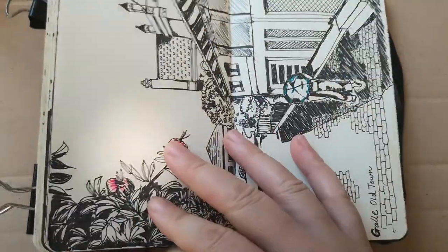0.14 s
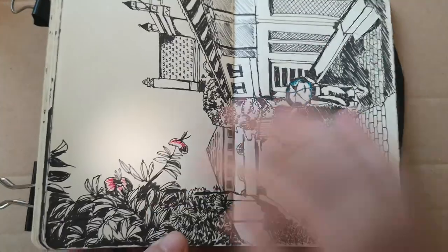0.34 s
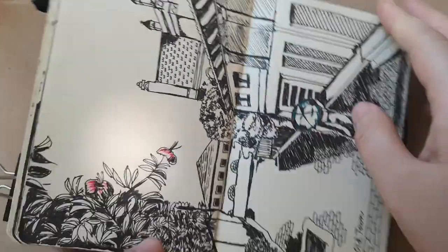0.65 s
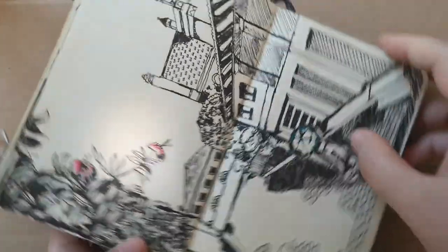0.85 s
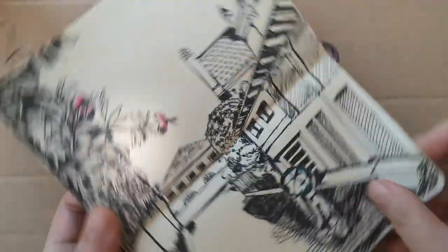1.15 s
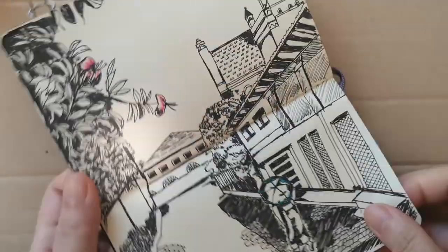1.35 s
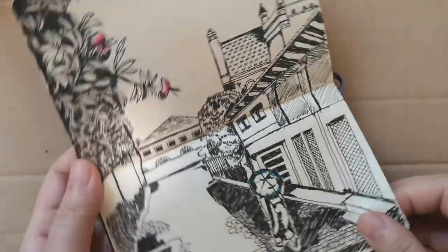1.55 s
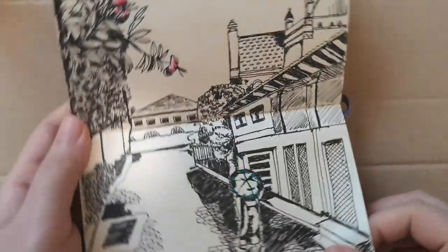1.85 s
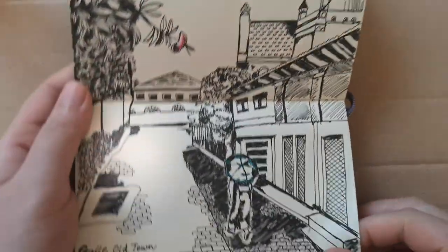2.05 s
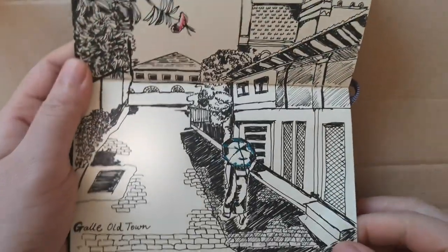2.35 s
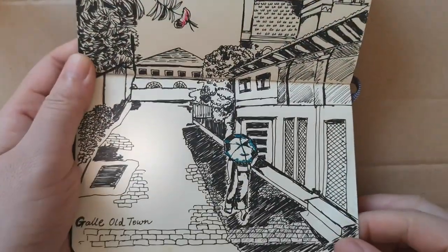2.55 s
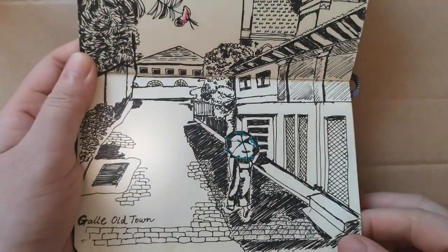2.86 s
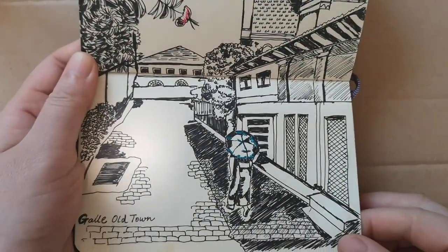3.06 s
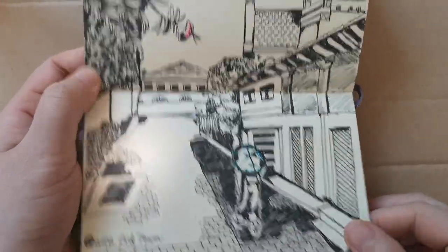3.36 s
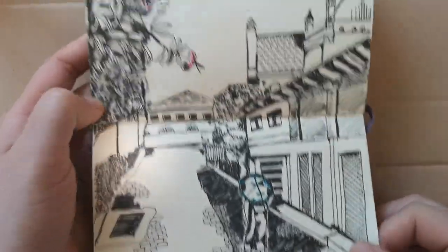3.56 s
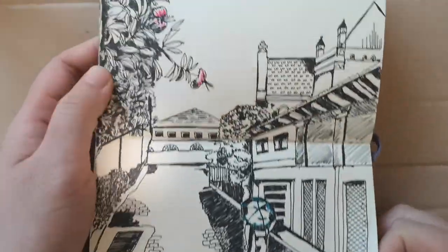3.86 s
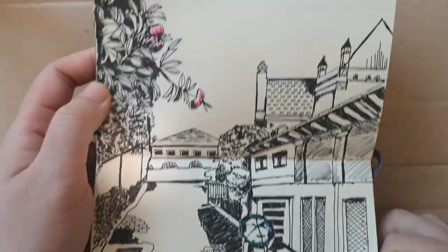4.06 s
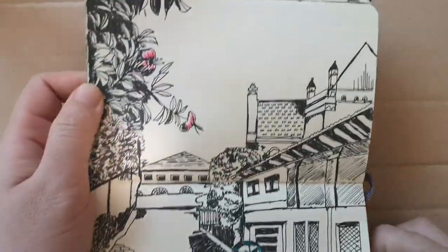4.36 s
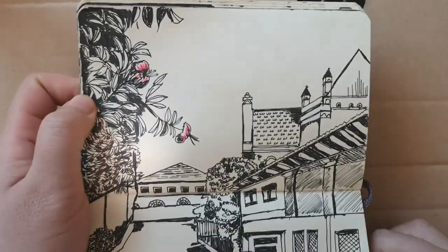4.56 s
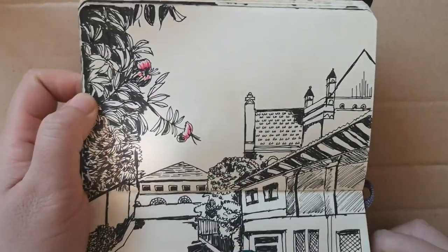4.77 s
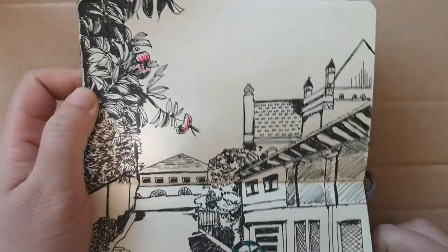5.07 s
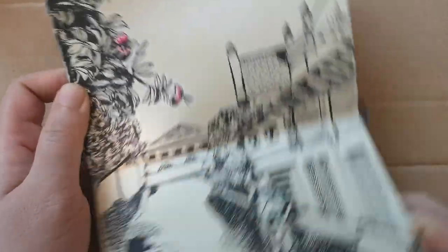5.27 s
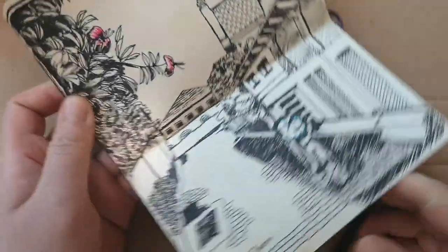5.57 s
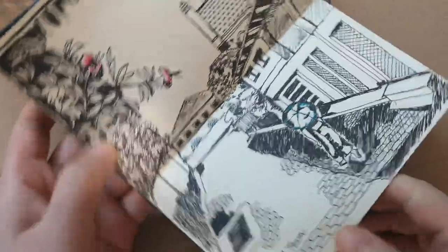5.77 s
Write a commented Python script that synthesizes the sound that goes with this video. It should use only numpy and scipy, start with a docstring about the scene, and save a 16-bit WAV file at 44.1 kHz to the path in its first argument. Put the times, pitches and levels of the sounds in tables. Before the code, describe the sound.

Close thuds and papery scraping of a hardback book being turned round on cardboard, followed by light crackling from its spine.

```python
"""A bump and a scrape: an open hardback sketchbook is turned round by hand on a sheet of cardboard,
close to a two-port microphone. The cover drags, knocks the board and judders as it sticks and slips,
while fingers brush the paper. Then the spine is bent and its glue crackles, right by the left port.
Behind the book lies a quiet small room with near walls and a low hum."""
import sys
import numpy as np
from scipy import signal
from scipy.fft import rfft, irfft, next_fast_len
from scipy.io import wavfile
from scipy.ndimage import uniform_filter1d, map_coordinates

SR = 44100
rng = np.random.default_rng(int(sys.argv[2]) if len(sys.argv) > 2 else 0)


def int16_out(signal):
    """Quantize to a 16-bit WAV file."""
    q = np.round(np.clip(np.atleast_2d(signal).T, -1, 1) * 32767)
    wavfile.write(sys.argv[1], SR, q.astype(np.int16))


N = 260631

# The cardboard under the book. Each row: mode in Hz, level in dB, time to fall 60 dB in seconds.
BOARD_MODES = [(44, -11, 0.17), (88.8, -18, 0.59), (147, -0.5, 0.13), (214.6, -1, 0.047), (292, -7, 0.072),
               (349.5, -14, 0.15)]
# The cover landing, close to the microphone. Each row: start in seconds, thud level in dB,
# thud pitch in Hz, clack level in dB, second thud in dB relative to the first.
COVER_BUMPS = [(0.025, -25, 233.5, -40, -4.5), (0.593, -43, 276, -60, -6), (0.996, -31, 235, -41.5, -16),
               (1.074, -40.5, 350, -46, -24), (1.225, -12.5, 181.3, -34.5, -34),
               (1.235, -42, 150, -27.5, 10), (1.34, -26, 294, -57, -40), (1.387, -34, 173, -45, -20),
               (2.7312, -35.5, 217, -47.5, 2.5), (3.588, -33, 159, -36, -7),
               (3.596, -33, 349, -45.5, -14.5), (3.773, -39.5, 409, -47, -4.5), (5.452, -54, 372, -48, -18),
               (5.567, -47.5, 363, -53, 2.5)]
def bumps():
    """The cover lands on one edge, then the other: each contact thuds, rings the board and clacks."""
    settle_s, second_clack_db = .0093, -10.5  # the far edge lands later, cushioned
    thuds, clacks, t = np.zeros(N), np.zeros((2, N)), np.arange(SR // 3) / SR
    for start, thud_db, hz, clack_db, second_db in COVER_BUMPS:
        for delay, thud_change, clack_change in [(0, 0, 0), (settle_s, second_db, second_clack_db)]:
            thud = board_thud(t, hz, t60=0.073, board_db=-6.5)
            add(thuds, start + delay, -amp(thud_db + thud_change - 3) * thud)
            add(clacks, start + delay, amp(clack_db + clack_change - 4) * clack(t))
    return ports(thuds) + ports(clacks, left_db=3.5)


def board_thud(t, hz, t60, board_db):
    """A soft blow gives a low damped tone and rings the cardboard; the peak is 1."""
    push = amp(-60 * t / t60) * np.sin(2 * np.pi * hz * t)
    board = amp(board_db) * ring(BOARD_MODES, t, scatter_db=1.5)
    thud = (push + board) * onset(t, 0.0027)
    return thud / np.abs(thud).max()


# The hard cover. Each row: mode in Hz, level in dB, time to fall 60 dB in seconds.
COVER_MODES = [(413, 3, 0.2), (470, -2, .12), (921, 0, 0.08), (1184, -20, 0.17), (1487, -11, 0.1),
               (1706, -9, 0.12), (2400, -17, 0.11)]
# The papery noise of a strike. Each row: frequency in Hz, level in dB.
CLACK_SPECTRUM = [(200, 6.5), (410, -1.5), (590, -2.5), (740, 2), (920, 6), (1400, -3.5), (1850, 1),
                  (2700, -5.5), (3800, -20.5), (8000, -20), (10500, -33.5), (15500, -56)]
def clack(t):
    """The cover's edge strikes: a snap, the flutter of the leaves, and the ring of the hard cover."""
    snap = amp(5 - 60 * t / 0.012)
    flutter = amp(-60 * t / 0.23)
    cover = amp(-3) * ring(COVER_MODES, t, scatter_db=2)
    leaves = (snap + flutter) * hiss(CLACK_SPECTRUM, size=len(t))
    return onset(t, .0004) * (leaves + cover)


# The dragged edge sticks and slips. Each row: start in seconds, jolt level in dB, sway level in dB.
EDGE_SLIPS = [(1.600, -20, -19), (1.702, -21, -24), (1.766, -24.5, -29), (1.817, -25.5, -46)]
def judder():
    """Every slip jolts the board and scuffs the edge; the cover rebounds once and the book sways on."""
    rebound_s, rebound_db, scuff_db = .0205, -11.5, -40
    jolts, scuffs, t = np.zeros(N), np.zeros((2, N)), np.arange(SR // 2) / SR
    for start, db, sway_db in EDGE_SLIPS:
        jolt = amp(db) * board_thud(t, hz=165, t60=0.031, board_db=-13)
        sway = amp(sway_db - 60 * t / 0.28) * np.sin(2 * np.pi * 88 * t) * onset(t, 0.058)
        add(jolts, start, jolt + sway)
        add(jolts, start + rebound_s, amp(rebound_db) * jolt)
        add(scuffs, start, amp(db + scuff_db) * clack(t))
    return ports(jolts, lead_s=-0.00073) + scuffs  # the jolts reach the right port first


# Low drag, cover scrape and skin on paper, heard close up. Each row: frequency in Hz, level in dB.
DRAG_SPECTRUM = [(20, -9.5), (45, 4), (100, -7.5), (160, -3), (300, 1.5), (420, -1), (540, -14), (900, -40)]
SCRAPE_SPECTRUM = [(200, -12.5), (400, -26), (600, -8.5), (700, -5), (900, 3.5), (1080, -4), (1250, 0),
                   (1460, -5.5), (2000, 1), (2500, -2.5), (3300, -13), (5000, -19), (9000, -40)]
SKIN_SPECTRUM = [(1200, -19.5), (2800, -2.5), (3900, 1), (4900, -3.5), (5900, 0), (6400, -5), (7500, 2.5),
                 (8000, 0.5), (8500, -7), (9200, -5), (10200, -15.5), (12000, -19.5), (15500, -27.5)]
# The hands shift the book. Each row: start, rise, length and time to fall 60 dB, all in seconds,
# then the levels of drag, scrape and skin in dB.
BOOK_MOVES = [(0.0, 0.0014, 0.074, 0.25, -46.5, -43.5, -54.5), (0.145, 0.025, 0.26, 2, -74.5, -72, -77),
              (0.314, .05, 0.074, 0.6, -78, -66, -60.5), (0.44, .06, .16, .3, -75, -68.5, -63),
              (0.581, 0.066, 0.066, 4.6, -59.5, -57, -58.5), (0.768, 0.041, 0.17, 0.55, -43, -41.5, -56.5),
              (0.955, 0.094, 0.2, 0.1, -46, -47.5, -51.5), (1.161, 0.048, 0.23, 0.29, -42, -44.5, -48.5),
              (1.44, 0.29, 0.39, 1.65, -60, -53.5, -58), (2.25, .06, 0.11, .6, -92, -76.5, -70.5),
              (3.023, 0.049, 0.16, 3.8, -79, -70, -102), (3.271, 0.094, 0.074, 6, -72, -66.5, -68),
              (3.408, 0.024, 0.039, 0.45, -58, -61.5, -88), (3.66, 0.17, 0.15, .5, -63, -60.5, -60),
              (3.97, 0.054, .55, 2.2, -82, -73, -74), (5.177, 0.052, 0.04, 2.5, -71, -66, -59.5),
              (5.243, 0.017, .19, .5, -67.5, -60, -56.5), (5.547, .04, 0.5, .3, -74.5, -66, -61.5)]
def sliding():
    """Each move rises, holds and dies away: the cover drags on cardboard, skin slides on the pages."""
    ease_db, slip_db = 5, 1  # through a move the scrape eases off and the fingers slip more
    grip_db = [[-79], [-78], [-84.5]]  # drag, scrape, skin: holding hands are never quite still
    power = amp(grip_db) ** 2 * np.ones(N)
    for start, rise, length, release, drag_db, scrape_db, skin_db in BOOK_MOVES:
        t = np.arange(int((length + release) * SR)) / SR
        speed = np.minimum(t / rise, 1) * amp(-60 * np.maximum(t - length, 0) / release)
        progress = np.minimum(t / length, 1) - .5
        levels = [np.full(len(t), drag_db), scrape_db - ease_db * progress, skin_db + slip_db * progress]
        add(power, start, (speed * amp(levels)) ** 2)
    drag, scrape, skin = np.sqrt(power)
    drag = drag * rub(DRAG_SPECTRUM, grain_db=3.0, grains_per_s=64, stutter_db=-0.1)
    scrape = scrape * rub(SCRAPE_SPECTRUM, grain_db=0.9, grains_per_s=500, stutter_db=2.3)
    skin = skin * rub(SKIN_SPECTRUM, grain_db=1.5, grains_per_s=480, stutter_db=1.7)
    return ports(drag) + ports(scrape, left_db=2.5) + ports(skin, left_db=3.5)


def rub(spectrum, grain_db, grains_per_s, stutter_db):
    """Friction: fibres catch in grains, the pressure stutters, the colour drifts as the contact moves."""
    frames = signal.stft(hiss(spectrum), nperseg=1024)[2]
    drift = uniform_filter1d(rng.standard_normal(frames.shape), 5, axis=1)
    drift_db = 2.6 * unit(uniform_filter1d(drift, 9, axis=2))
    noise = signal.istft(frames * amp(drift_db), nperseg=1024)[1][:, :N]
    roughness_db = grain_db * wobble(grains_per_s) + stutter_db * wobble(40)
    return unit(noise * amp(roughness_db))


# A finger or a page edge brushes past, left of centre.
# Each row: start in seconds, level in dB, length in seconds, pitch in Hz.
PAGE_SWIPES = [(0.0, -45, 0.016, 2200), (0.334, -49, 0.0072, 2250), (0.339, -60, 0.082, 2100),
               (0.495, -69, 0.11, 7400), (0.78, -51, 0.018, 1370), (0.807, -41, 0.048, 2040),
               (0.898, -52, .027, 1300), (0.992, -44, 0.067, 7050), (0.997, -47.5, 0.075, 4480),
               (1.331, -44.5, 0.018, 5900), (1.333, -50, 0.099, 7730), (1.881, -55, 0.14, 2450),
               (5.246, -50.5, 0.064, 3780), (5.279, -53, 0.059, 2260)]
def swipes():
    """A quick swipe sings in a grainy band of its own; the shriller, the more the left port hears it."""
    width_hz, left_hz_per_db, attack_share = 880, 624, .07
    band_shape = [(-6, -50), (-2, -16), (-1, -5), (0, 0), (1, -6), (2, -22), (5, -60)]  # steps, dB
    out, t = np.zeros((2, N)), np.arange(SR // 3) / SR
    for start, db, length, hz in PAGE_SWIPES:
        step = 1 + width_hz / hz
        band = [(hz * step ** k, fall_db) for k, fall_db in band_shape]
        stroke = onset(t, attack_share * length) * np.exp(-(t / length) ** 3)
        grains = unit(hiss(band, size=len(t)) * amp(0.53 * wobble(718)[:len(t)]))
        add(out, start, ports(amp(db) * stroke * grains, left_db=hz / left_hz_per_db))
    return out


# The spine's glue lets go, right beside the left port. Each row: start in seconds, level in dB.
GLUE_RUNS = [(3.8307, -49), (3.8597, -46), (3.895, -56.5), (3.903, -45), (3.9348, -50), (3.9637, -50),
             (4.0155, -48.5), (4.0342, -56), (4.1784, -55), (4.2632, -49), (4.2827, -46), (4.375, -41),
             (4.568, -44.5), (4.645, -53), (4.669, -42.5)]
def crackle():
    """A thumb bends the spine and runs of tiny slips ring it; the louder the run, the longer it lasts."""
    bend_start, bend_end = 3.63, 4.42  # seconds; faint ticks are strewn between these times
    out, t = np.zeros(N), np.arange(SR // 40) / SR
    faint_ticks = [(bend_start + (bend_end - bend_start) * when, -54 - 8 * weakness)
                   for when, weakness in rng.random(size=(28, 2))]
    for start, db in list(GLUE_RUNS) + faint_ticks:
        run_s = .0025 * 2 ** ((db + 50) / 6)  # doubles with every 6 dB
        gaps, softness = rng.random((2, 16))
        delays = np.cumsum(.0004 + .001 * gaps)
        slips = np.zeros(2 * len(t))
        slips[0] = 1
        slips[np.round(delays * SR).astype(int)] = amp(-7 * softness) * (delays < run_s)
        add(out, start, amp(db - 12.5) * np.convolve(slips, glue_slip(t)))
    softened = filtered(out, lambda hz: 1 / np.sqrt(1 + (hz / 8300) ** 18))
    return ports(softened, lead_s=.0001, left_db=19.5)


# The book's spine. Each row: mode in Hz, level in dB, time to fall 60 dB in seconds.
SPINE_MODES = [(1130, -16, 0.005), (3130, -9, 0.004), (4180, 4, 0.006), (5750, -0.5, 0.004),
               (7400, -4, 0.006)]
def glue_slip(t):
    """One slip of the glue: a dry crack, and the spine's ring at a pitch of its own."""
    detune = np.exp(.06 * rng.standard_normal())
    spine = ring(SPINE_MODES, t * detune, scatter_db=2)
    crack = amp(3 - 60 * t / .004) * np.diff(rng.standard_normal(len(t) + 1))
    return spine + crack


# A hand leans on the book, heard alike at both ports. Each row: start in seconds, level in dB.
HAND_PRESSES = [(0.033, -25), (0.599, -34.5), (0.62, -34), (1.082, -28.5), (1.228, -29), (4.837, -41.5),
                (4.902, -42.5)]
def presses():
    """The cardboard flexes under a hand in one or two slow waves."""
    out, t = np.zeros(N), np.arange(SR // 4) / SR
    flex = amp(1.5 - 60 * t / 0.073) * np.sin(2 * np.pi * 47 * t) * onset(t, 0.003)
    for start, db in HAND_PRESSES:
        add(out, start, amp(db) * flex)
    return out


# The small room round the microphone. Each row: frequency in Hz, time to fall 60 dB in seconds.
WALL_DECAY = [(100, 0.37), (400, 0.14), (2000, 0.47), (8000, 0.21)]
def room_echo(x):
    """Near walls answer after 5 ms, each frequency dying at its own speed."""
    hz, t, frames = signal.stft(rng.standard_normal((2, SR // 2)), SR, nperseg=256)
    decay = amp(-60 * t / along(WALL_DECAY, hz)[:, None])
    tail = signal.istft(frames * decay, SR, nperseg=256)[1]
    tail = np.pad(tail / np.linalg.norm(tail[0]), ((0, 0), (SR // 200, 0)))
    mid, side = signal.fftconvolve(x, tail, axes=1)[:, :N]
    side = filtered(side, lambda hz: hz / (hz + 500))  # long waves reach both ports alike
    return np.array([mid + side, mid - side]) / np.sqrt(2)


# The hum behind the book. Each row: time in seconds, level in dB.
HUM_LEVELS = [(0, -61.5), (2.2, -66.5), (2.5, -62.5), (3.6, -59.5), (5.9, -58.5)]
# The room's still air. Each row: frequency in Hz, level in dB.
AIR_SPECTRUM = [(12, -47), (20, -18), (44, -9.5), (64, -13.5), (101, -12.5), (175, -20.5), (207, -23),
                (259, -39), (333, -38), (427, -46.5), (1870, -34.5), (2090, -41), (2760, -36), (3640, -42),
                (15500, -56.5)]
def room_tone():
    """Still air and a low hum that barely wavers."""
    hum_hz, wander_rad, waver_db, air_db = 58.3, .2, 1, -63.5
    t = np.arange(N) / SR
    phase = 2 * np.pi * hum_hz * t + wander_rad * wobble(10)
    hum_db = np.interp(t, *np.transpose(HUM_LEVELS)) + waver_db * wobble(4.06)
    return amp(hum_db) * unit(np.sin(phase)) + amp(air_db) * hiss(AIR_SPECTRUM)


# How alike the two ports hear diffuse sound. Each row: frequency in Hz, likeness from 0 to 1.
PORT_LIKENESS = [(60, 1), (250, 0.91), (600, 1), (1100, 0), (2500, 0.14), (10000, 0.03)]
def hiss(spectrum, size=N):
    """Stereo noise of rms 1, alike at both ports only in the low range."""
    def mid_and_side(hz):
        angle = np.arccos(np.clip(along(PORT_LIKENESS, hz), 0, 1)) / 2
        return amp(along(spectrum, hz)) * [np.cos(angle), np.sin(angle)]
    mid, side = filtered(rng.standard_normal((2, size)), mid_and_side)
    return unit(np.array([mid + side, mid - side]))


def ports(x, lead_s=0.000557, left_db=0):
    """Sound from one side reaches the left port lead_s earlier and left_db louder than the right."""
    side = np.array([[.5], [-.5]])
    return filtered(x, lambda hz: np.exp(2j * np.pi * hz * lead_s * side)) * amp(left_db * side)


def ring(modes, t, scatter_db):
    """Damped modes, at slightly new strengths for each blow."""
    return sum(amp(db + scatter_db * rng.standard_normal() - 60 * t / t60) * np.sin(2 * np.pi * hz * t)
               for hz, db, t60 in modes)


def onset(t, rise_s):
    """A cushioned rise from 0 towards 1."""
    return 1 - np.exp(-t / rise_s)


def amp(db):
    """Decibels to gain."""
    return 10 ** (np.asarray(db) / 20)


def unit(x):
    """x at rms 1."""
    return x / np.sqrt(np.mean(x ** 2) + 1e-20)


def along(points, hz):
    """(Hz, value) points read on a log axis."""
    freqs, values = np.transpose(points)
    return np.interp(np.log(hz + 1), np.log(freqs), values)


def wobble(rate):
    """A smooth random curve, rate knots a second."""
    knots = rng.standard_normal(int(N * rate / SR) + 4)
    return map_coordinates(knots, [np.arange(N) * rate / SR])


def filtered(x, response):
    """x through a response given as a function of frequency."""
    size = x.shape[-1]
    padded = next_fast_len(size + SR // 4)
    return irfft(rfft(x, padded) * response(np.fft.rfftfreq(padded, 1 / SR)), padded)[..., :size]


def add(track, start_s, sound):
    """Mix a sound into a track from start_s on."""
    start = max(round(start_s * SR), 0)
    part = sound[..., :N - start]
    track[..., start:start + part.shape[-1]] += part


def scene():
    """The handled book close to the microphone, the room behind it."""
    knocks, spine = bumps() + judder(), crackle()
    echo = room_echo(amp(-8) * knocks + amp(-21) * spine)
    return knocks + spine + echo + presses() + sliding() + swipes() + room_tone()


def record(dry):
    """The recorder keeps nothing above 15.7 kHz."""
    return filtered(dry, lambda hz: hz < 15700)


dry = scene()
out = record(dry)
int16_out(out)
```